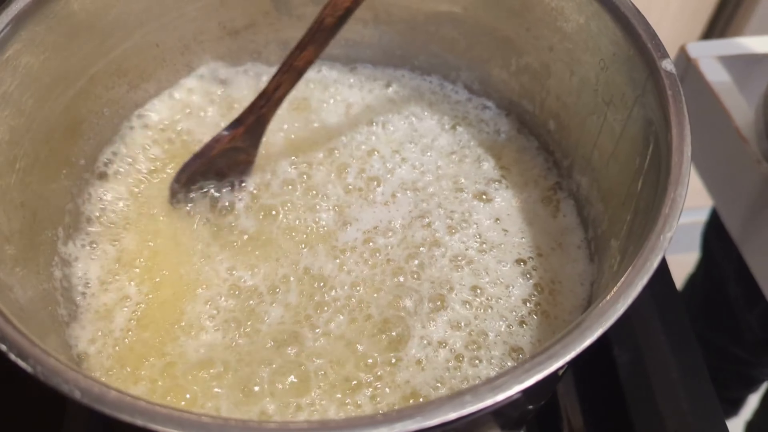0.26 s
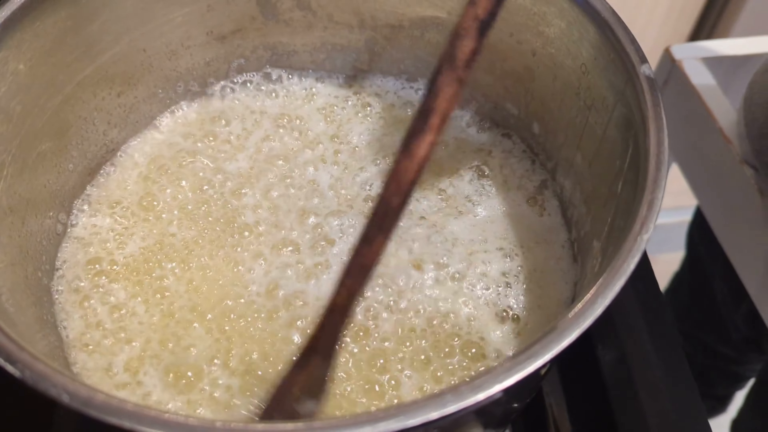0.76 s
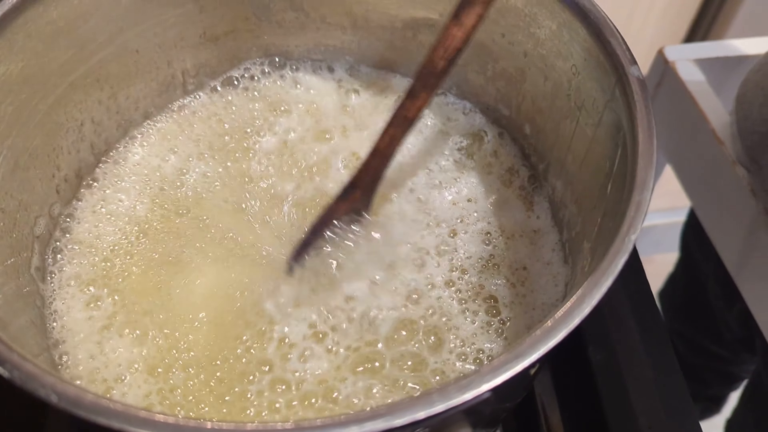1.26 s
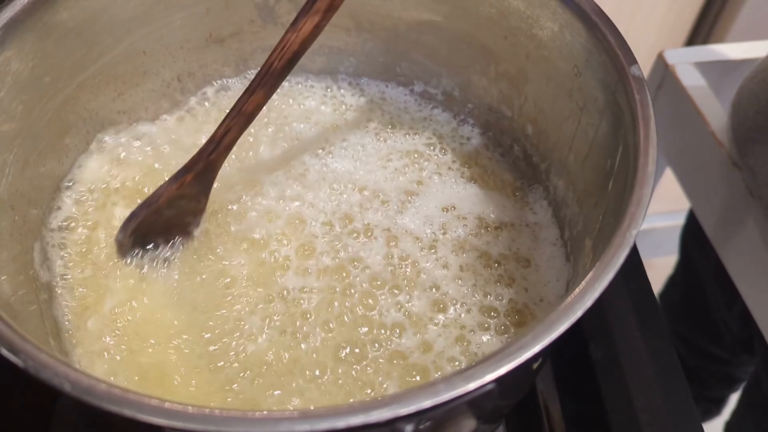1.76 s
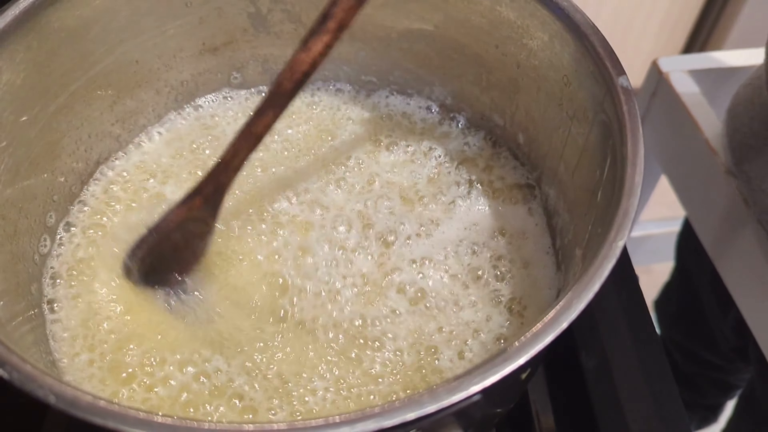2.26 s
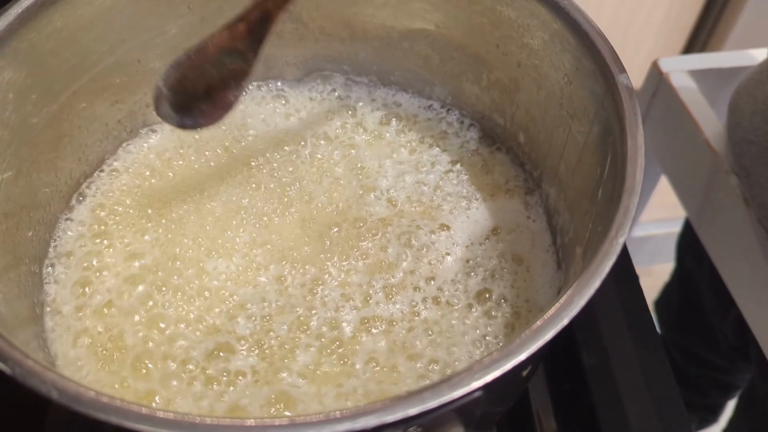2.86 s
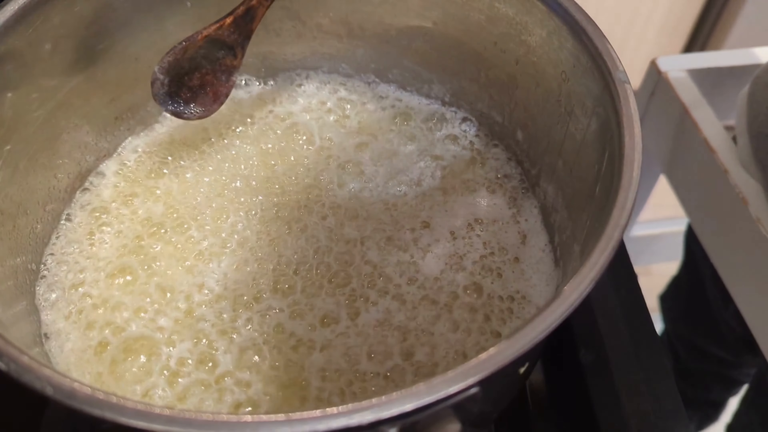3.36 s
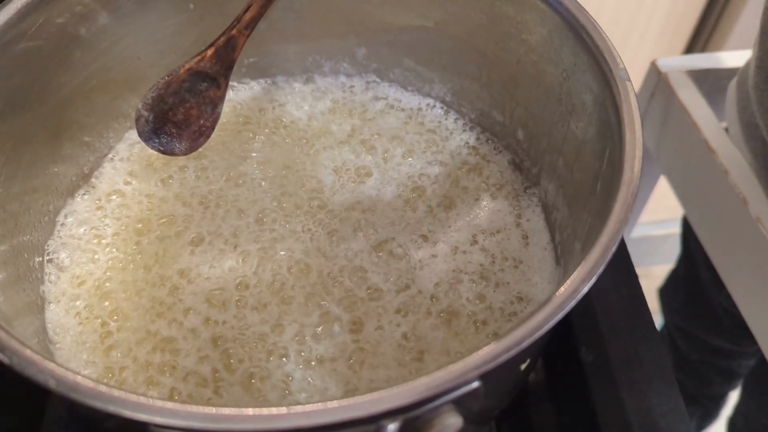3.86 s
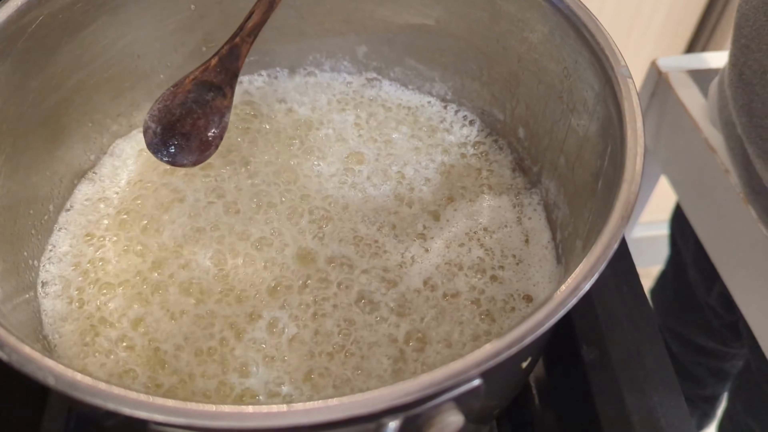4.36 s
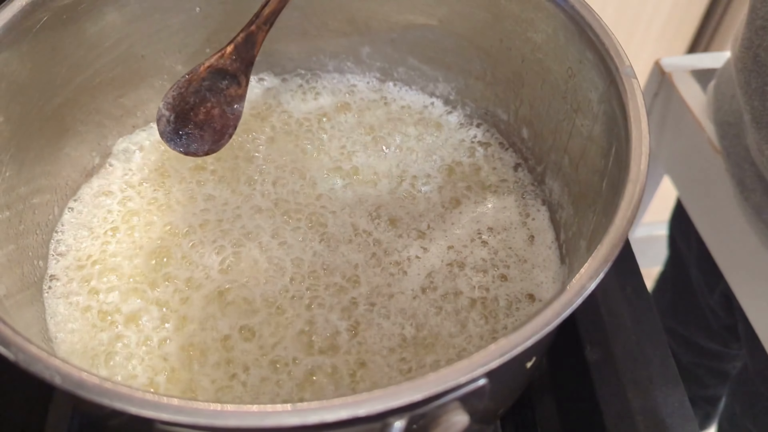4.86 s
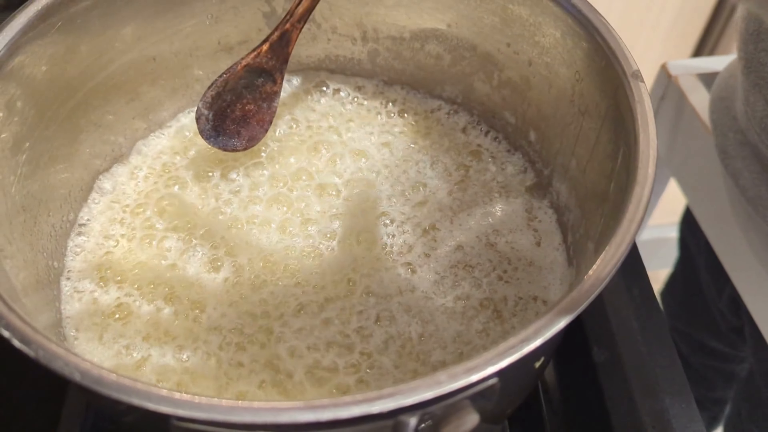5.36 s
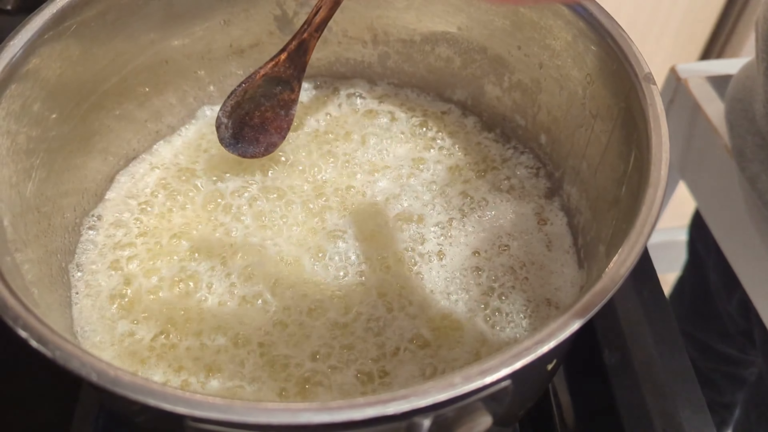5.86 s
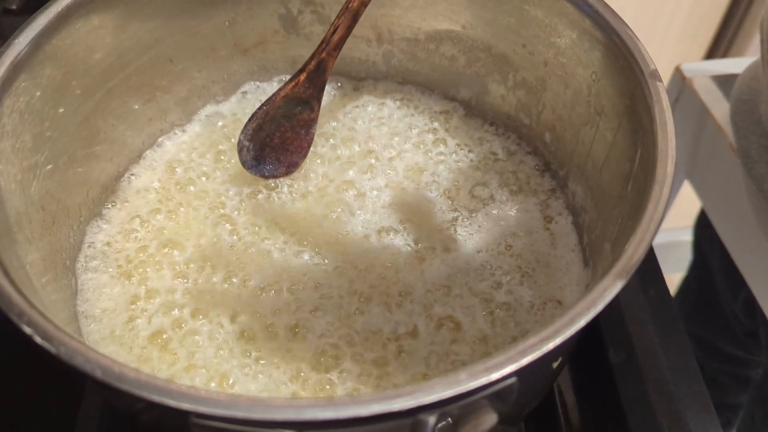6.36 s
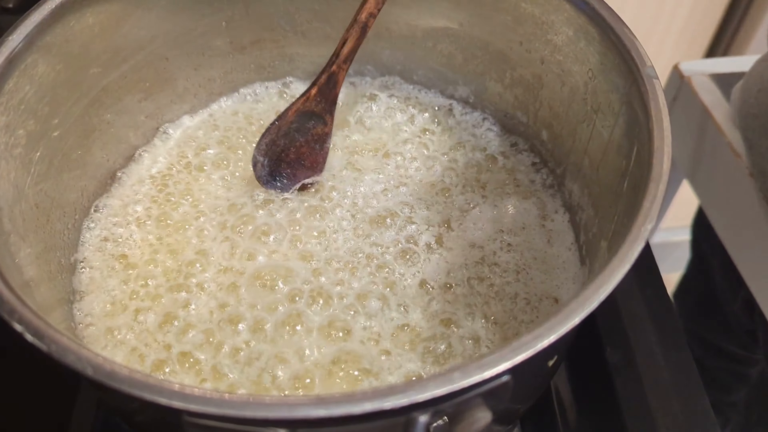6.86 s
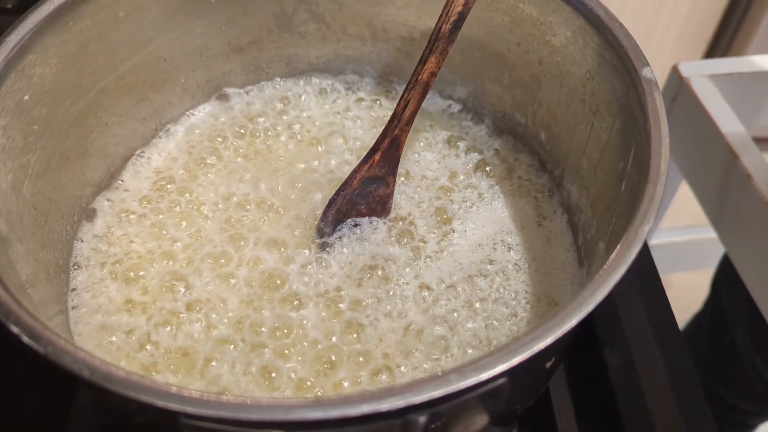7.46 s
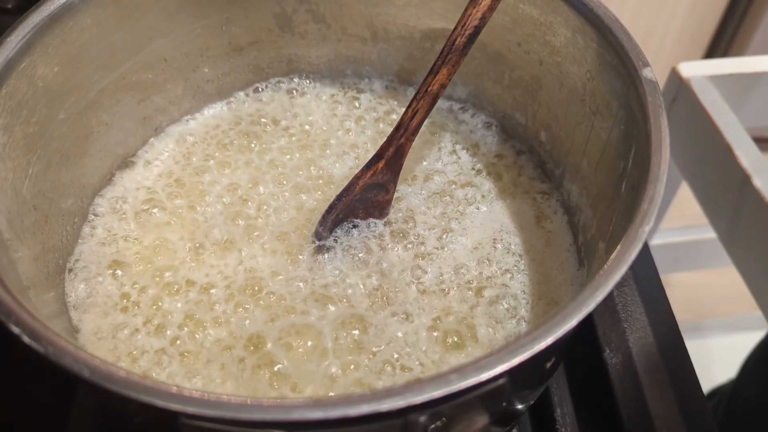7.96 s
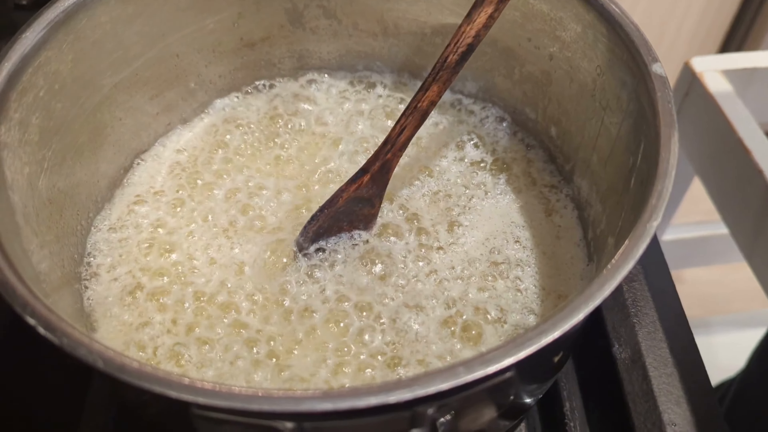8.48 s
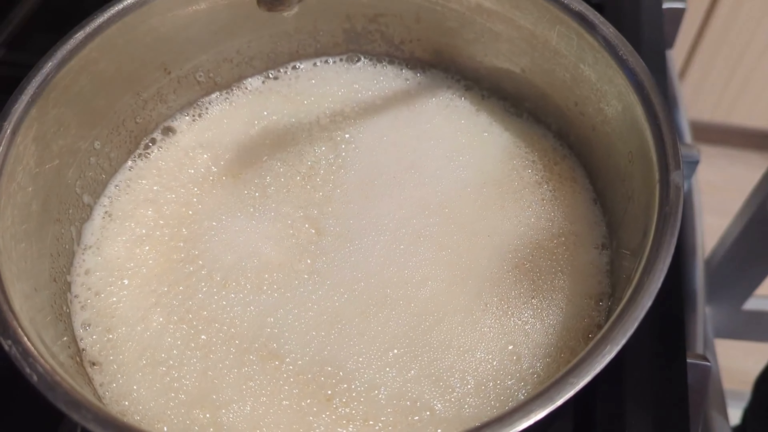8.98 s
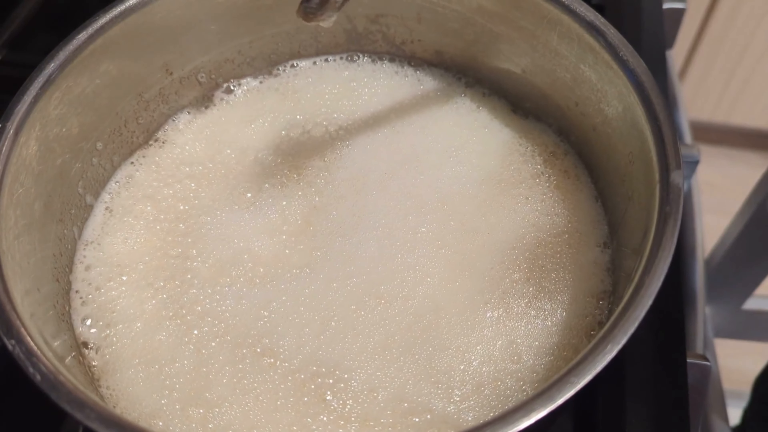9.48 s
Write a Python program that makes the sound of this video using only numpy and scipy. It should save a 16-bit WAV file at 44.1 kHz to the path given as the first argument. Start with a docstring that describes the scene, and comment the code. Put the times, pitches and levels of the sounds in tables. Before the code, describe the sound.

Butter foams close to the microphone in a steel saucepan, with a fine fizz, bubbling pops and sharp little spits. A wooden spoon stirs at first, each stroke freeing a rush of fizz. A few dry scuffs, rubs and soft pan knocks follow as the boil builds. Near the end the sound breaks off and resumes as a much quieter foam. A low appliance hum runs underneath in the kitchen.

```python
"""In a kitchen, butter foams close by in a steel saucepan, and the boil builds up.
Tiny bursting bubbles fizz, larger ones ring the air in the pan, and water spits out of the fat.
Each stroke of a wooden spoon frees a rush of fizz; there are a few scuffs, rubs and soft knocks.
An appliance hums behind it all. Near the end the sound breaks off and resumes on a much quieter foam."""
import sys
import numpy as np
from scipy import signal
from scipy.fft import rfft, irfft
from scipy.io import wavfile
from scipy.ndimage import uniform_filter1d, map_coordinates

SR = 44100
rng = np.random.default_rng(int(sys.argv[2]) if len(sys.argv) > 2 else 0)


def to_wav(s):
    """Save 16-bit WAV."""
    ch = np.atleast_2d(s).T  # columns
    pcm = np.round(np.clip(ch, -1, 1) * 32767)  # PCM
    wavfile.write(sys.argv[1], SR, pcm.astype(np.int16))


N = 428644
T = np.arange(N) / SR
BREAK_S = 8.64  # the foam is much quieter from here on


# The tone of the fizz. Each row: frequency in Hz, relative level in dB.
FIZZ_TONE = [(2000, -10), (5200, -16), (6400, -2), (7200, 0.5), (8100, -3.5), (9200, 0), (10200, -1.5),
             (11300, 0.5), (12700, 0.5), (14000, -2), (15800, -6)]

def fizz(level_db, bright_db, chains_per_s=32, chain_s=0.012, chain_db=2.5, walls_db=-4.5):
    """The finest bubbles burst on top; one sets off its neighbours in a chain that dies out."""
    triggers = (rng.random(N) < chains_per_s / SR) * np.minimum(rng.exponential(size=N), 3)
    chains = signal.lfilter([1], [1, -np.exp(-1 / (chain_s * SR))], triggers + 1e-18)
    bubbles = pings(bright_db) * np.sqrt(1 + undb(chain_db) * chains)
    sound = unit(bubbles) + undb(walls_db) * wall_echoes(bubbles[0], fade_s=0.0085, spots=5)
    return unit(colour(sound, FIZZ_TONE)) * undb(level_db) * stereo(0.72)


def pings(bright_db, per_s=5000, fade_s=0.0014, samples=80):
    """Tiny bubbles each ring for an instant at their own pitch; neighbours of one size burst together."""
    start = np.flatnonzero(rng.random(N) < per_s / SR)
    hz = rng.uniform(5500, 17000, N)[start]
    weakness, length, place = np.clip(rng.standard_normal((N // 4, 3))[:len(start)].T, -2.5, 2.5)
    # bubbles close in time and pitch are louder or softer together
    cluster = map_coordinates(rng.standard_normal((1000, 40)), [T[start] * 35, hz / 800], order=1)
    t = T[:samples]
    rings = np.sin(2 * np.pi * hz[:, None] * t) * np.exp(-t / (fade_s * undb(3 * length))[:, None])
    where = (start[:, None] + np.arange(samples)).ravel()
    tilt_db = bright_db[start] * np.log2(hz / 11000)
    gains = undb(3 * cluster - weakness + tilt_db + np.outer([.5, -.5], 3 * place))
    return unit(np.array([np.bincount(where, (rings * g[:, None]).ravel(), N)[:N] for g in gains]))


# Strokes of the spoon. Each row: peak time in seconds, level of the freed fizz in dB, rise in seconds.
SPOON_STROKES = [(.322, -37.5, 0.016), (.68, -50.5, 0.097), (1.06, -38.5, 0.025), (1.29, -39.5, 0.1),
                 (1.8, -41, 0.34), (2.2, -47, 0.19), (2.52, -45, .12), (2.8, -47, 0.27),
                 (7.2, -44.5, 0.057)]

def foam(heave_db=0.6, stroke_fall_s=0.37):
    """Foam heaves by itself and the spoon frees more fizz: gives the level in dB and the spoon's share."""
    resting_db = build_up(-44.5, start_below_db=4.5, settle_s=0.2, calm_db=-66, regrow_db_per_s=6)
    resting = undb(resting_db + heave_db * wander(7)) ** 2
    stirred = sum((undb(db) * swell(s, rise, stroke_fall_s)) ** 2 for s, db, rise in SPOON_STROKES)
    return 10 * np.log10(resting + stirred), stirred / (resting + stirred)


# The tone of the simmer's echoes. Each row: frequency in Hz, relative level in dB.
SIMMER_TONE = [(400, -28.5), (800, -19), (1100, -28.5), (1270, 3), (1550, -8.5), (1900, 3), (2150, 1),
               (2450, -3), (3100, -4.5), (4500, -16.5), (8000, -46.5)]

def simmer(level_db, ring_db=-3, wash_db=-4.5):
    """Larger bubbles ring the air in the pan; each stirs every note with a different strength."""
    clicks = snaps(per_s=1100, spread_db=4) * undb(wander(30))
    ring = unit(pan_air([clicks * rng.uniform(-1.33, 1, N) for _ in AIR_NOTES]))
    wash = unit(colour(wall_echoes(clicks, fade_s=0.0081, spots=4), SIMMER_TONE))
    return (undb(ring_db) * ring + undb(wash_db) * wash) * undb(level_db) * stereo(2.4)


# The notes of the air in the pan. Each row: pitch in Hz, width in Hz, relative level in dB,
# how far the left side runs ahead in radians.
AIR_NOTES = [(1268.4, 48, 3, 0.4), (1318, 103, 3, -4), (1437, 17, 2, -2), (1657, 58, -4, -2.5),
             (1920, 78, 2, 3.5), (2362, 120, -4.5, 0.5), (2640, 85, -8, -2.5), (2834, 87.5, -6.5, 2),
             (3274, 90, -5.5, 3.5), (3610, 120, -7.5, 1.5)]

def pan_air(pushes):
    """The air in the pan rings, with one push for each note; left and right hear it out of step."""
    ring = 0
    for push, (hz, width, db, lead) in zip(pushes, AIR_NOTES):
        turn = undb(db) * np.exp(.5j * lead * np.array([[1], [-1]]))
        ring = ring + (turn * resonate(push, hz, width)).real
    return band(ring, 1310, 5000)


# The tone of the crackle. Each row: frequency in Hz, relative level in dB.
CRACKLE_TONE = [(1500, -10.5), (2500, 4), (3100, 1), (3800, 1.5), (4400, 5), (5000, 0.5), (5500, 0),
                (6200, 1), (7000, -9.5), (9000, -20.5), (16000, -19)]

def crackle(level_db):
    """Small bubbles snap under the foam and are heard by way of the pan walls."""
    clicks = snaps(per_s=4000, spread_db=3.5) * undb(1.53 * wander(40))
    echoes = wall_echoes(clicks, fade_s=0.0037, spots=12)
    return unit(colour(echoes, CRACKLE_TONE)) * undb(level_db) * stereo(-2.6)


# The biggest bubbles. Each row: peak time in seconds, relative level in dB, pitch in Hz, fade in seconds.
BIG_POPS = [(.085, -41, 2330, .007), (.136, -36.5, 2300, .012), (.77, -36, 2404, 0.015),
            (.851, -37.5, 2400, .007), (1.162, -36, 1620, 0.014), (1.243, -35.5, 1350, 0.01),
            (1.275, -37, 1930, 0.029), (1.33, -38.5, 1550, 0.016), (1.518, -35.5, 1850, 0.009),
            (1.768, -34, 2440, 0.024), (2.199, -36, 1375, .024), (2.341, -31, 2010, 0.0082),
            (2.432, -32, 1920, 0.0089), (2.735, -38, 1580, .013), (2.881, -34.5, 2000, 0.008),
            (4.339, -36.5, 2200, .008), (4.551, -34, 1800, .01), (4.749, -29.5, 1350, 0.018),
            (4.767, -31.5, 2200, 0.013), (4.865, -36, 1950, .016), (5.446, -39, 2030, 0.01),
            (6.477, -33, 2000, .01), (6.691, -31, 1416, 0.012), (6.785, -36, 1990, .008),
            (6.898, -29.5, 1970, 0.017), (7.274, -33, 2410, 0.0074), (7.322, -34, 2390, .018),
            (7.411, -30.5, 1920, 0.013), (7.465, -32.5, 1920, 0.0086), (7.672, -31.5, 2200, 0.016),
            (7.915, -40, 1850, .012), (8.16, -38, 2000, 0.011), (8.396, -30, 1855, 0.012),
            (8.589, -36, 2344, .01)]

def big_bubbles(simmer_db, glide=0.0607, rise_s=0.0087, extra_pops=16):
    """A large bubble collapses in a wet pop whose pitch sinks; steam roughens it and the pan rings on."""
    out = np.zeros((3, N))  # left, right and into the air of the pan
    t = T[:SR // 7] - 1 / 28  # zero at the peak of the pop
    chance = rng.uniform([0, 1400], [BREAK_S, 2620], (extra_pops, 2))
    extras = [(s, simmer_db[int(s * SR)] - 0.5, hz, 0.007) for s, hz in chance]
    for s, db, hz, fall in BIG_POPS + extras:
        phase = 2 * np.pi * np.cumsum(hz * (1 - glide * np.tanh(t / fall))) / SR
        tone = np.sqrt(2) * np.sin(phase + rng.uniform(0, np.pi, (3, 1)))
        steam = resonate(rng.standard_normal((3, len(t))), hz, width_hz=400).real
        pop = unit(undb(-3) * tone + unit(band(steam, 1200, 3200)))
        envelope = np.exp(-(np.minimum(t, 0) / rise_s) ** 2 - np.maximum(t, 0) / fall)
        add(out, max(s + t[0], 0), undb(db - 3) * pop * envelope)
    return out[:2] + pan_air([out[2]] * len(AIR_NOTES))


# The sharpest spits of fat. Each row: start in seconds, relative level in dB,
# how much louder the left side is in dB, fade of the spray in seconds.
FAT_SPITS = [(.3119, -24, 2, .008), (.773, -28, 5, .001), (1.0452, -23, -1, .003), (1.3264, -30, 3, .004),
             (1.3855, -21, 12, .006), (1.8828, -28, 2, .003), (1.8922, -33, 1, .001),
             (2.1765, -21, 4, .003), (2.2254, -23, 0, .004), (2.657, -23, 3, .002), (2.7948, -24, 0, .003),
             (2.9811, -27, 12, .001), (2.9943, -28, 4, .003), (3.7228, -30, 9, .0007),
             (3.7374, -27.5, 10, .0007), (3.902, -27, -1, .007), (3.931, -23, -1, .002),
             (4.326, -29, -2, .005), (4.365, -26, 0, .003), (5.1494, -33.5, 5, .0007),
             (5.7759, -25, 13, .0006), (5.9556, -29, 10, .0007), (6.303, -21.5, 8, .002),
             (6.8374, -24, 11, .0006), (7.0771, -30, 5, .0006), (7.1603, -24, 17, .0006),
             (8.1725, -28, 11, .0006), (8.4381, -17, 5, .001), (9.131, -30, 0, 0.0012),
             (9.4363, -29.5, 3, 0.0014)]

def spits(fizz_db, spray_db=-12, extra_spits=260):
    """A water droplet bursts out of the fat: a snap and a brief spray, each with its own brightness."""
    out, t = np.zeros((2, N)), T[:SR // 30]
    chance = rng.uniform([0, 1 / 30, -1], [T[-1], 1, 1], (extra_spits, 3))
    extras = [(s, fizz_db[int(s * SR)] + 6 - np.log(odds), 3 - 3 * place, 0.00046)
              for s, odds, place in chance]
    for s, db, left_db, fall in FAT_SPITS + extras:
        burst = (t == 0) + undb(spray_db) * rng.standard_normal(len(t)) * np.exp(-t / fall)
        low_hz = rng.uniform(6000, 10000)
        snap = band(burst, low_hz, low_hz + 6000)
        add(out, s, undb(db - 2) * snap / abs(snap).max() * stereo(left_db))
    return out


# The tone of a scuff. Each row: frequency in Hz, relative level in dB.
SCUFF_TONE = [(300, -21), (900, -13.5), (1500, -6.5), (2400, 3.5), (3100, 7.5), (4100, 4), (5400, -3),
              (7000, 0), (10000, -6), (13000, -7.5), (16000, -13)]
# Scuffs beside the stove; the row at 8.6 s is the spoon shifting in the pan. Each row: peak time in seconds, #
# relative level in dB, rise in seconds, then for its sharp edge: fade in seconds, boost in dB, highest
# frequency in Hz.
SCUFFS = [(3.061, -27.5, 0.0262, 0.046, -2, 9500), (3.252, -26, 0.013, 0.05, 3.5, 17000),
          (4.166, -22, 0.017, 0.049, 1, 15100), (8.6, -39, 0.064, 0.018, -0.5, 6900),
          (9.497, -42.5, 0.0097, 0.023, 2.5, 12000)]

def scuffs(split_hz=6800, linger=1.38):
    """Brief dry brushing; the treble arrives straight, the rest from all around."""
    around = band(rng.standard_normal((2, N)), 200, split_hz) * stereo(-1.2)
    straight = band(rng.standard_normal(N), split_hz, 19000)
    brush = colour(around + straight, SCUFF_TONE) * undb(wander(300))
    dull = band(brush, 200, 3840)
    body = edge = 0
    for s, db, rise, fall, edge_db, top_hz in SCUFFS:
        body += dull * undb(db) * swell(s, rise, linger * fall)  # outlasts the edge
        edge += band(brush, 3160, top_hz) * undb(db + edge_db) * swell(s, rise, fall)
    return body + edge * stereo(-2.4)


# The notes of the pan when knocked or rubbed. Each row: pitch in Hz, relative level in dB,
# seconds to fade by 60 dB.
PAN_NOTES = [(338, 1, 0.032), (414, 6.5, 0.035), (620, -1.5, 0.024), (671, 2, 0.04), (780, -6, .04),
             (960, 3.5, 0.052), (1243, 3.5, 0.03), (1930, 5, 0.03), (2200, -2.5, .02)]
# Soft knocks. Each row: start in seconds, peak level in dB, favoured pitch in Hz.
PAN_KNOCKS = [(3.105, -34, 690), (3.369, -23.5, 1740), (3.379, -31, 438), (3.427, -39.5, 1000),
              (7.591, -24.5, 620), (7.603, -35, 1100)]

def knocks(rattle=0.35):
    """The pan bumps dully on its grate; each bump favours a different range of its notes."""
    out, t = np.zeros((2, N)), T[:SR // 4]
    for s, db, favoured_hz in PAN_KNOCKS:
        push = np.exp(-t / 0.00047) * (1 + rattle * rng.standard_normal(len(t)))
        ring = 0
        for hz, note_db, ring_s in PAN_NOTES:
            octaves_away = np.log2(hz / favoured_hz)
            ring += undb(note_db - 28 * octaves_away ** 2 - 60 * t / ring_s) * np.sin(2 * np.pi * hz * t)
        bump = signal.fftconvolve(push, ring)[:len(t)] * (1 - np.exp(-t / 0.0014))
        add(out, s, undb(db) * bump / abs(bump).max())
    return out


# The tone of the spoon's scraping. Each row: frequency in Hz, relative level in dB.
SPOON_TONE = [(150, -9), (350, -5), (700, -3.5), (1100, -5), (2200, -8.5), (4000, -11.5), (10000, -34)]
# Soft rubs. Each row: peak time in seconds, relative level in dB, rise in seconds, fade in seconds.
SPOON_RUBS = [(.3, -47.5, 0.036, 0.2), (1.41, -46, 0.03, 0.11), (2.11, -43, 0.073, 0.2),
              (3.1, -36.5, 0.074, 0.048), (3.41, -39, 0.051, 0.046), (4.87, -43.5, 0.083, 0.06),
              (5.14, -43, 0.075, 0.053), (7.78, -55, .06, 0.113), (9.68, -51.5, 0.1, 0.13)]

def rubs():
    """Wood slides on steel in small slips that ring the pan, muffled by the butter."""
    pressure = sum(undb(db - 3) * swell(s, rise, fall) for s, db, rise, fall in SPOON_RUBS)
    slips = snaps(per_s=1200, spread_db=4)
    slips = slips + wall_echoes(slips, fade_s=0.00092, spots=2)
    ring = sum(undb(db) * resonate(slips, hz, np.log(1000) / (np.pi * ring_s)).real
               for hz, db, ring_s in PAN_NOTES)
    grit = colour(slips, SPOON_TONE)
    return (undb(-3) * unit(ring) + undb(-5) * unit(grit)) * pressure


# The notes of the hum. Each row: pitch in Hz, relative level in dB, how much louder the left side is
# in dB, how far it runs ahead in radians, waver in dB.
HUM_NOTES = [(120.06, -34, 5, -0.13, 1), (239.6, -57, -2, -0.1, 3), (360.6, -50.5, -1.5, -0.7, 2)]

def appliance_hum(opening_db=2, opening_s=0.35):
    """Mains power hums in wavering notes, louder for a moment each time the sound comes on."""
    hum = 0
    for hz, db, left_db, lead, waver_db in HUM_NOTES:
        phase = 2 * np.pi * hz * T + lead * np.array([[.5], [-.5]]) + 0.028 * waver_db * wander(3.5)
        hum += np.sqrt(2) * np.sin(phase) * undb(db + waver_db * wander(6)) * stereo(left_db)
    opening = np.max([(T > s) * np.exp(-((T - s) / opening_s) ** 2) for s, _, _ in HEARD_SPANS], axis=0)
    return hum * undb(build_up(0.33, start_below_db=3.5, settle_s=4, calm_db=-3) + opening_db * opening)


# Low drones of the appliance. Each row: pitch in Hz, width in Hz, relative level in dB.
DRONES = [(155.2, 7.3, -57), (272.5, 17, -50.5)]
# The tone of its rushing air. Each row: frequency in Hz, relative level in dB.
RUSH_TONE = [(20, -17.5), (35, -9.5), (52, 2.5), (70, -2), (95, 0.5), (160, -3.5), (200, -4.5), (280, 0),
             (400, -8), (500, -7.5), (650, -15), (1000, -20), (1700, -29.5), (2500, -19), (3200, -34),
             (5000, -40.5), (8000, -38.5)]

def appliance_air():
    """The appliance drones and its air rushes, alike on both sides only in the bass."""
    drone = sum(undb(db) * unit(band(rng.standard_normal(N), hz - width / 2, hz + width / 2))
                for hz, width, db in DRONES)
    middle, side = rng.standard_normal((2, N))
    side = (0.28 * side + 0.5 * band(side, 376, 18000)) * np.array([[1], [-1]])
    rush = undb(-44) * unit(colour(middle + side, RUSH_TONE))
    growth_db = build_up(.5, start_below_db=3.5, settle_s=1.3, calm_db=-3)
    return (rush + drone * stereo(-1.5)) * undb(growth_db)


def kitchen(x, ring_s=0.41):
    """Hard walls give a short echo that loses the treble."""
    t = T[:SR // 2]
    tail = unit(rng.standard_normal((2, len(t))) * undb(-60 * t / ring_s) * (t > .005)) / np.sqrt(len(t))
    return signal.oaconvolve(x, band(tail, 150, 6500), axes=1)[:, :N]


def wall_echoes(clicks, fade_s, spots):
    """Clicks from several spots bounce between the steel walls and reach each side by their own paths."""
    t = T[:SR // 40]
    spot = rng.integers(0, spots, N)
    paths = rng.standard_normal((spots, 2, len(t))) * np.exp(-t / fade_s)
    echoes = sum(signal.oaconvolve((clicks * (spot == k))[None], paths[k], axes=1) for k in range(spots))
    return unit(echoes)[:, :N]


def snaps(per_s, spread_db):
    """Clicks at random moments, a few much larger than the rest."""
    size = undb(spread_db * np.minimum(rng.standard_normal(N), 3))
    return unit((rng.random(N) < per_s / SR) * size * rng.choice([-1, 1], N))


def build_up(full_db, start_below_db, settle_s, calm_db, regrow_db_per_s=0):
    """A level in dB that climbs toward full_db, then restarts from calm_db after the break."""
    climbing = full_db - start_below_db * np.exp(-T / settle_s)
    return np.where(T < BREAK_S, climbing, calm_db + regrow_db_per_s * (T - BREAK_S))


def swell(s, rise, fall):
    """A rounded rise up to time s, then a fade."""
    out = np.zeros(N)
    near = slice(max(int((s - 3 * rise) * SR), 0), int((s + 8 * fall) * SR))
    t = T[near] - s
    out[near] = np.exp(-(np.minimum(t, 0) / rise) ** 2 - np.maximum(t, 0) / fall)
    return out


def wander(per_s):
    """A random drift with a typical size of 1."""
    points = rng.standard_normal(int(N / SR * per_s) + 2)
    return unit(np.interp(T * per_s, np.arange(len(points)), points))


def colour(x, tone, size=4096):
    """Shape a sound with a tone table, keeping the power of white noise."""
    hz, db = np.transpose(tone)
    grid = np.maximum(np.arange(size // 2 + 1) * SR / size, 1)
    gains = unit(undb(np.interp(np.log(grid), np.log(hz), db)))
    # build the filter so that it never rings ahead of a click
    cepstrum = irfft(np.log(gains))
    response = irfft(np.exp(rfft(2 * cepstrum[:size // 2], size) - cepstrum[0]))
    return signal.oaconvolve(np.atleast_2d(x), response[None], axes=1)[:, :N]


def resonate(x, hz, width_hz):
    """Ring at one pitch; the result is in complex numbers, so its phase can be turned."""
    pole = np.exp((2j * hz - width_hz) * np.pi / SR)
    return signal.lfilter([1 - abs(pole)], [1, -pole], x + 1e-18)


def band(x, low_hz, high_hz):
    """Keep what lies between two frequencies."""
    return signal.sosfilt(signal.butter(2, [low_hz, high_hz], "band", fs=SR, output="sos"), x + 1e-18)


def add(out, s, sound):
    """Mix a short sound in at time s."""
    start = int(s * SR)
    out[:, start:start + sound.shape[-1]] += sound[..., :max(N - start, 0)]


def undb(db):
    """Turn decibels into a gain."""
    return np.exp(np.asarray(db) * (np.log(10) / 20))


def unit(x):
    """Scale to an average power of 1."""
    return x / np.sqrt(np.mean(x ** 2))


def stereo(left_db):
    """Left and right gains, with the left louder by left_db."""
    return undb(np.array([[left_db], [-left_db]]) / 2)


def scene():
    """The butter is near and fairly dry; scuffs, rubs and knocks echo more in the room."""
    fizz_db, stirring = foam()
    # young foam and stirred foam have finer bubbles, which brighten the fizz (dB per octave)
    bright_db = 5 * np.exp(-T / 1.5) + 3.5 * stirring
    simmer_db = build_up(-37, start_below_db=9, settle_s=3, calm_db=-73.5, regrow_db_per_s=16)
    simmer_db -= 2 * stirring  # the simmer dips a little with each stroke
    crackle_db = build_up(-44, start_below_db=9, settle_s=0.52, calm_db=-67.5, regrow_db_per_s=6)
    butter = simmer(simmer_db) + crackle(crackle_db) + fizz(fizz_db, bright_db)
    butter += big_bubbles(simmer_db) + spits(fizz_db)
    handling = scuffs() + rubs() + knocks()
    echo = kitchen(undb(-9) * butter + undb(-1) * handling)
    return butter + handling + echo + appliance_hum() + appliance_air()


# The stretches in which the sound is on. Each row: start in seconds, end in seconds, gain.
HEARD_SPANS = [(.063, 8.633, 1.), (8.669, 8.68, .8), (8.78, 10, 1.)]

def record(dry, fade_in_s=0.0077, top_hz=16000):
    """Each stretch fades in quickly and stops abruptly, and the highest treble is cut."""
    on = sum(gain * (1 - np.exp(-np.maximum(T - start, 0) / fade_in_s)) * (T < end)
             for start, end, gain in HEARD_SPANS)
    treble_cut = signal.ellip(12, .1, 75, top_hz, fs=SR, output="sos")
    return signal.sosfilt(treble_cut, dry * uniform_filter1d(on, size=90))


dry = scene()
out = record(dry)
to_wav(out)
```